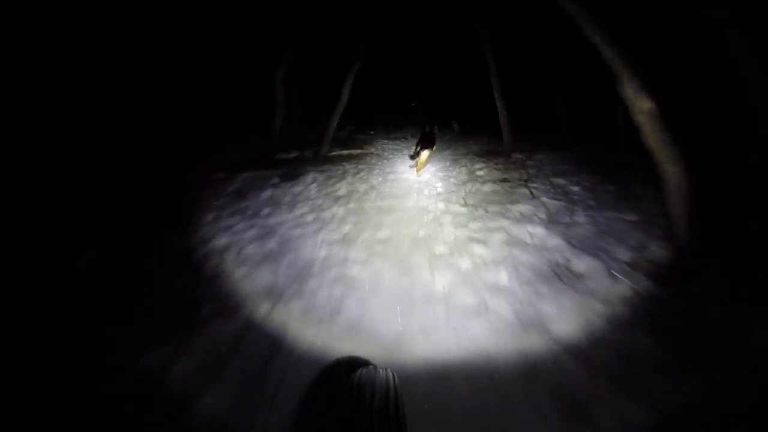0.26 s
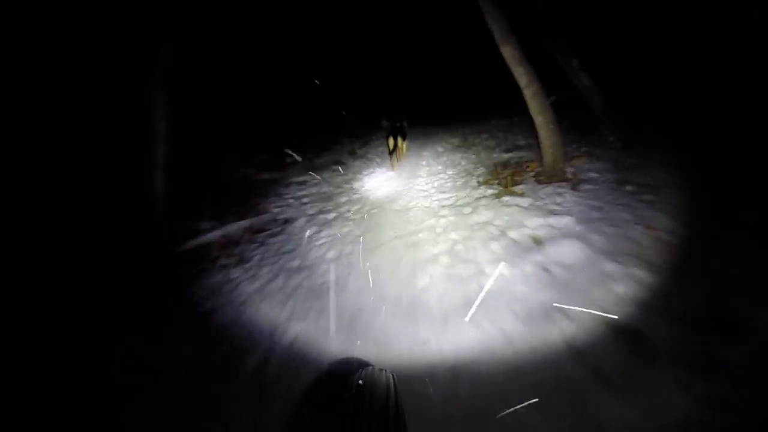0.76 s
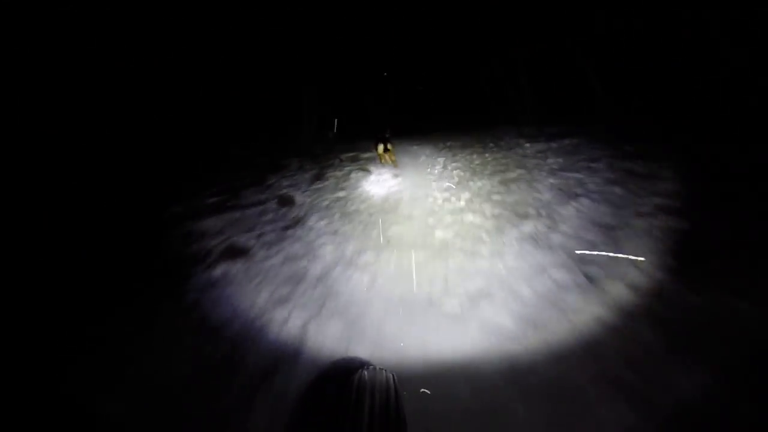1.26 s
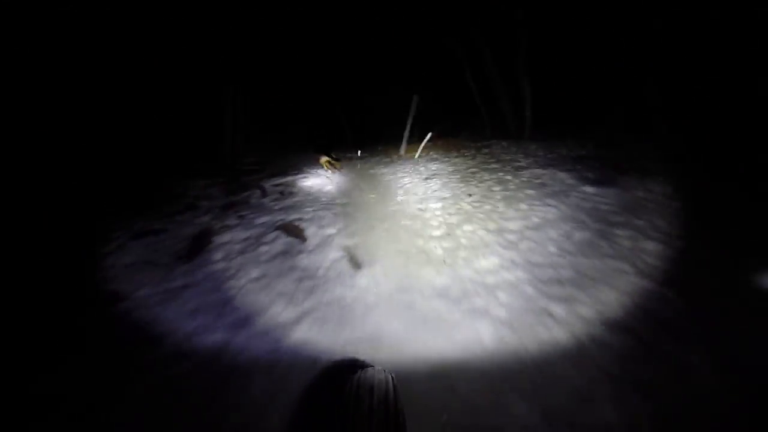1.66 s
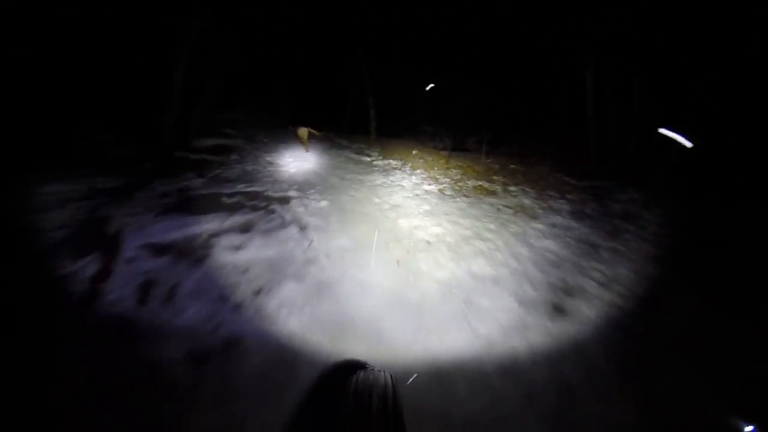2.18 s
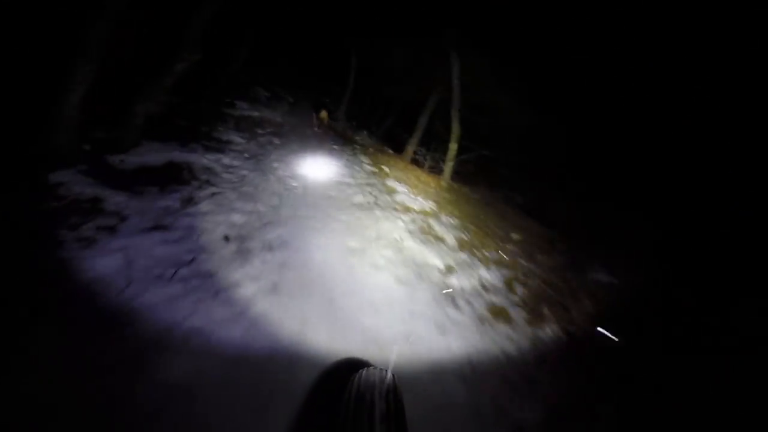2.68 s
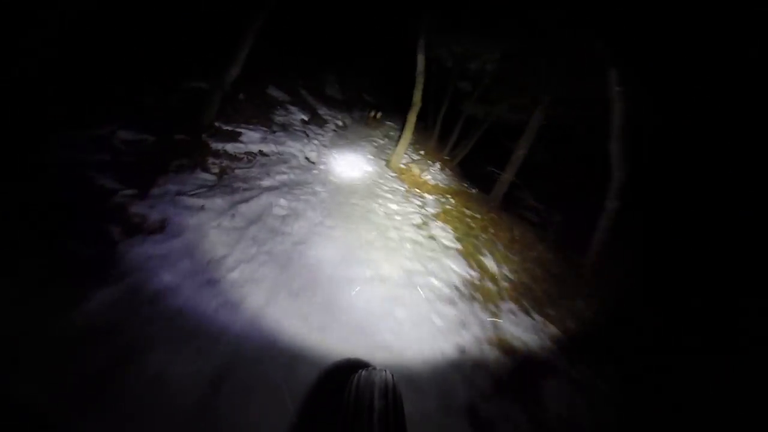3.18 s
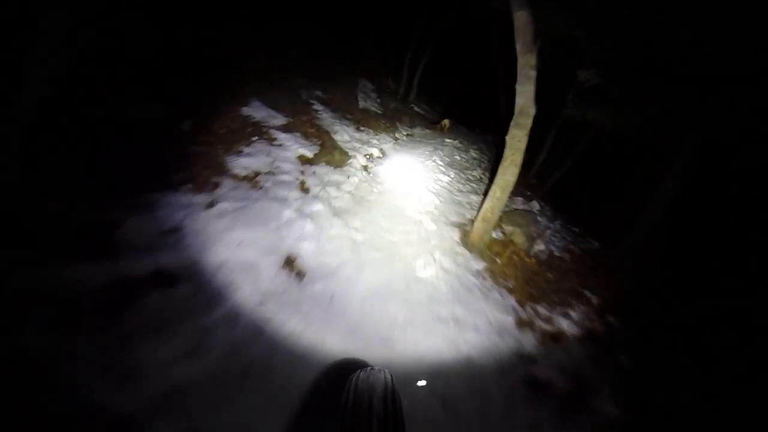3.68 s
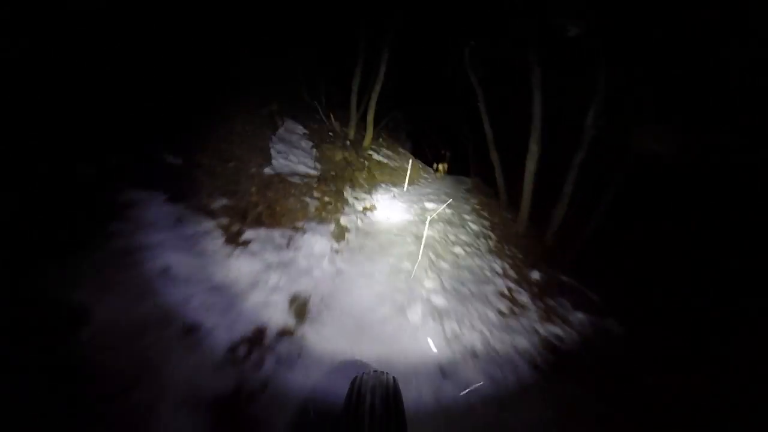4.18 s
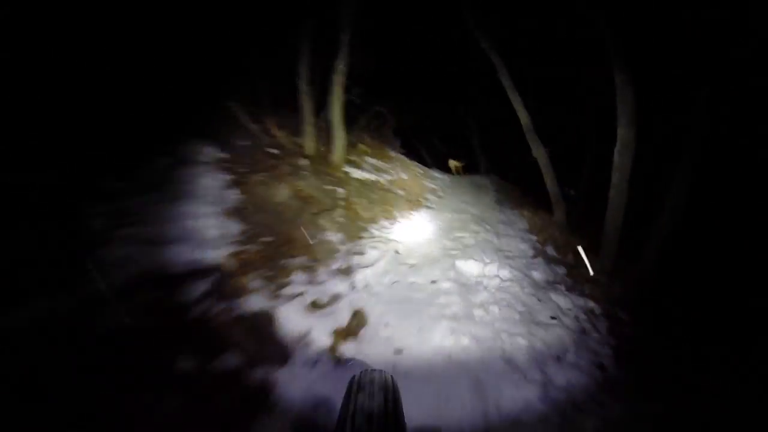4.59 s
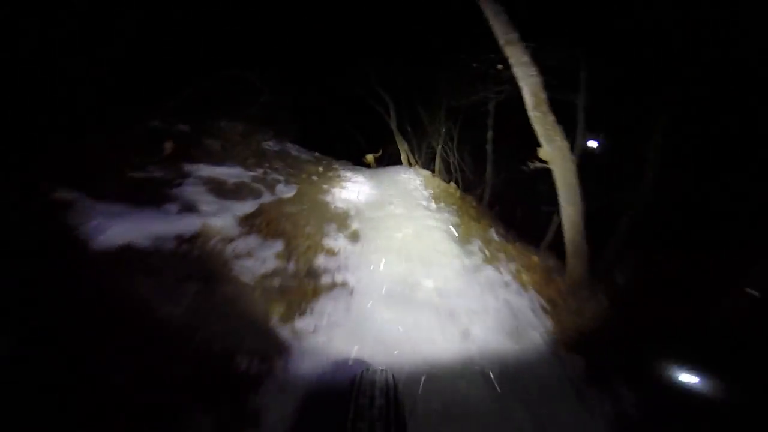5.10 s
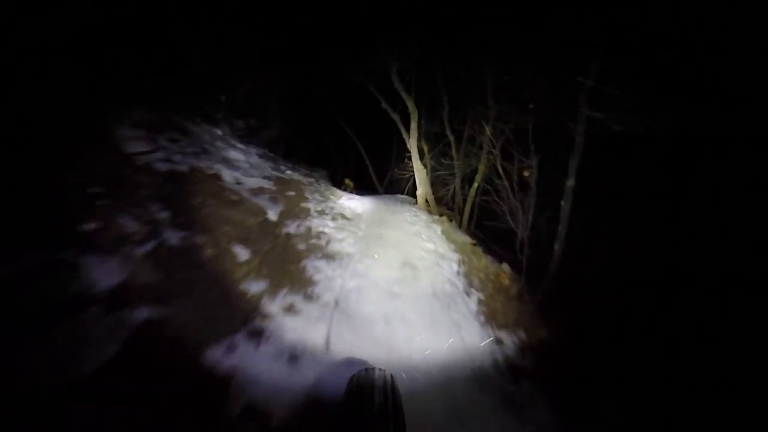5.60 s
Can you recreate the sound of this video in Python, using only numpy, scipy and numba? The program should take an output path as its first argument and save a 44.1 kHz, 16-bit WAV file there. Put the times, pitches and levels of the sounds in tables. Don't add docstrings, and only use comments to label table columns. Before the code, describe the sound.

Close, boxy handlebar sound of a fast snow ride: booming frame, gritty crunch, a camera clattering in its case, and brief squeaky disc brake rubs.

```python
import sys
import numpy as np
from scipy import signal
from scipy.io import wavfile
from scipy.ndimage import uniform_filter1d
from numba import njit

SR = 44100
rng = np.random.default_rng(int(sys.argv[2]) if len(sys.argv) > 2 else 0)


def master_out(mix):
    frames = np.transpose(np.atleast_2d(mix))
    ceiling = np.clip(frames, -1, 1)
    pcm = np.round(ceiling * 32767).astype(np.int16)
    wavfile.write(sys.argv[1], SR, pcm)


def field_ratio(decibels):
    return 10 ** (np.asarray(decibels, dtype=float) / 20)


N = 257984

# pitch in Hz, width in Hz, level in dB.
FRAME_TONES = [(34.8, 39, -9.5), (62.2, 53, -9), (109.1, 16, 0), (127.8, 21.7, -6)]
FORK_TONES = [(153.2, 47.3, 4), (209.7, 66, -5.5), (278.2, 11.5, -9.5), (436, 610, -37)]
MOUNT_TONES = [(725.4, 84, 3), (826, 52, 3), (980.5, 27.8, 3.5), (1380, 196, -1), (1574, 247, -5.5)]
SHELL_TONES = [(1922, 71, 5), (2094, 77, 7), (2390, 224, 3.5), (2622, 82, 2), (2790, 137, -3),
               (3190, 120, -6)]
DOOR_TONES = [(4000, 270, -7.5), (5013, 220, 1.5), (5447, 184, 2.5), (6050, 250, 0), (6610, 600, -10.5)]
CLICK_TONES = [(8140, 1160, -7), (8760, 150, -1.5), (10180, 400, 2.5), (11600, 2200, -6), (15300, 830, -4)]
DISC_TONES = [(5000, 36, -3), (5470, 150, -4.5), (6110, 60, -0.5), (8400, 700, -20)]

# time in seconds, frame shake in dB.
RUTS = [(0.0, -16), (1.37, -18), (1.43, -13), (1.9, -21.5), (1.95, -7.5), (2.08, -32), (2.13, -12.5),
        (2.2, -25), (2.3, -11), (2.56, -21.5), (2.78, -12.5), (3.19, -19.5), (3.24, -15.5), (4.1, -13.5),
        (4.68, -16.5), (4.97, -16), (5.38, -22), (5.85, -16.5)]
# time in seconds, crunch level in dB.
CRUST = [(0.0, -33), (0.31, -35), (0.75, -35.5), (0.91, -31), (1.09, -32.5), (1.94, -34), (2.8, -29.5),
         (3.03, -33), (3.45, -31), (3.75, -32.5), (4.07, -30), (4.4, -34), (5.13, -36.5), (5.31, -40),
         (5.51, -37.5), (5.85, -34.5)]
# start in seconds, peak in dB.
BUMPS = [(0.109, -1.5), (0.331, -5), (0.396, -5), (0.528, -2), (0.728, -4), (1.138, -9), (1.7, -2.5),
         (2.149, -6.5), (3.469, -4), (4.747, -5), (4.939, -3), (4.999, -7), (5.171, -7.5)]

# start in seconds, edge click in dB, shell in dB.
SLAMS = [(.0142, -37, -19), (.0837, -36, -18), (.1447, -25.5, -14), (.2005, -36, -17), (.2775, -30, -19),
         (.3538, -22.5, -12), (.4821, -34, -14.5), (.5302, -43, -19), (.548, -24.5, -16),
         (.6729, -34.5, -18), (.7253, -35, -18.5), (.9297, -39, -17), (.9838, -25, -13), (1.1185, -27, -6),
         (1.2148, -39, -22), (1.655, -40, -16), (1.8647, -31, -28), (2.2254, -30, -17),
         (2.3007, -28, -13.5), (2.9617, -32.5, -19), (3.3046, -34, -10.5), (3.468, -37, -17),
         (4.4742, -26.5, -14), (4.738, -16, -4.5), (4.9362, -23.5, -9.5), (5.0476, -24.5, -12),
         (5.2046, -16.5, -10), (5.3547, -29, -19.5), (5.4062, -33.5, -20.5), (5.476, -29, -14.5)]
# start in seconds, edge click in dB, shell in dB.
SLAPS = [(.0508, -34, -28), (.406, -35, -33), (.435, -34, -22), (.7937, -29.5, -17.5),
         (.8875, -28.5, -19.5), (1.0593, -38, -20), (1.1865, -29.5, -21), (1.264, -28, -18),
         (2.161, -29.5, -22.5), (2.4066, -38, -17), (2.559, -41, -20), (3.5327, -28, -9.5),
         (3.6743, -39, -16), (3.796, -39.5, -18.5), (3.8579, -31, -13), (4.013, -30, -13),
         (4.0817, -44, -17), (4.1378, -30.5, -20), (4.2505, -23.5, -7.5), (4.2966, -43, -10),
         (4.3762, -44, -21), (4.4068, -34.5, -18), (4.6117, -34.5, -18), (4.9945, -29, -21.5),
         (5.1394, -36.5, -17.5), (5.2636, -37, -19), (5.289, -49, -19.5), (5.661, -33, -17),
         (5.6936, -36, -14), (5.807, -38.5, -18)]
# start in seconds, edge click in dB.
TICKS = [(0.0326, -52), (.259, -39), (0.7723, -43), (0.813, -43), (.8428, -39), (1.302, -42),
         (1.366, -35.5), (1.3925, -38), (1.4253, -42), (1.4845, -36), (1.5214, -38.5), (1.5797, -38.5),
         (1.8127, -36.5), (1.9844, -43), (2.0325, -39.5), (2.213, -55), (2.4818, -42), (2.9002, -32.5),
         (3.3394, -38), (3.416, -41.5), (4.19, -34.5), (4.593, -44), (4.682, -38.5), (4.7025, -39),
         (4.8337, -39), (4.8888, -35.5), (5.0923, -36), (5.553, -47), (5.609, -50), (5.752, -43)]

# start in seconds, peak in dB, pitch in Hz, shell in dB.
CABLE_KNOCKS = [(0.323, -7, 2230, -14), (0.475, -14, 1480, -15), (0.481, -8.5, 1384, -16),
                (0.666, -15, 1490, -13), (0.828, -12, 1390, -22.5), (1.023, -10.5, 1330, -8),
                (1.119, -4.5, 1355, -6), (1.216, -17, 1460, -29), (1.292, -10.5, 1380, -12),
                (1.504, -15.5, 1510, -13), (1.605, -6.5, 1380, -16), (1.883, -4.5, 1424, -6.5),
                (1.934, -16, 1325, -12.5), (2.788, -9, 1360, -11), (3.011, -22, 2090, -13),
                (3.455, -3, 700, -8), (5.209, 3, 2340, -7.5), (5.445, -17, 2390, -18.5)]
# start in seconds, peak in dB, pitch in Hz, shell in dB.
TYRE_THUMPS = [(0.126, -12, 330, -16.5), (0.244, -13.5, 356, -22), (0.532, -11, 353, -50),
               (1.529, -18, 444, -20), (1.713, -12, 406, -15), (2.003, -13.5, 393, -36),
               (2.13, -26, 361, -23), (2.27, -20, 595, -11), (.727, -17, 403, -27),
               (2.794, -18.5, 470, -26), (3.468, -12, 390, -15), (4.938, -18, 504, -53)]

# start in seconds, time held in seconds, pad rub in dB.
LEVER_PULLS = [
    (.9, 0.21, -54),
    (1.47, 0.24, -44),
    (1.76, 0.29, -46),
    (2.1, 0.25, -59),
    (2.33, 0.33, -50),
    (2.66, 0.18, -42.5),
    (2.98, 0.13, -54.5),
    (3.72, 0.27, -56),
]
# start in seconds, level in dB, pitch in Hz, length in seconds.
SQUEAKS = [(0.508, -52, 8100, .03), (0.675, -46, 8060, 0.026), (1.021, -40, 6000, .016),
           (1.054, -33, 6050, 0.013), (1.105, -26, 6040, .014), (1.494, -30, 6110, .017),
           (1.522, -35, 6110, 0.013), (1.573, -56, 8620, .057), (1.61, -41, 6110, 0.032),
           (1.637, -43, 8600, .03), (1.703, -24, 6110, 0.017), (1.696, -46, 8650, .024),
           (1.738, -48, 6110, 0.064), (1.807, -37, 6110, .013), (1.869, -25.5, 6130, 0.013),
           (1.937, -46, 6200, .021), (1.97, -31.5, 6120, 0.014), (1.977, -42, 8550, 0.033),
           (2.178, -56, 6800, 0.17), (3.422, -62, 8400, .036)]
# start in seconds, peak in dB, length in seconds.
GRABS = [
    (2.554, -28.5, 0.047),
    (2.702, -28, 0.044),
    (3.1564, -26, 0.021),
    (3.415, -39, 0.021),
    (3.742, -26, 0.027),
]


def shake(frame_db, fork_db):
    jolts = field_ratio(3.1 * walk(23.49)) * rng.standard_normal(N)
    frame = through(jolts, FRAME_TONES)
    fork_jolts = 0.56 * jolts + field_ratio(3.28 * walk(30)) * rng.standard_normal(N)
    fork = through(fork_jolts, FORK_TONES)
    out = field_ratio(frame_db) * (frame + field_ratio(fork_db) * fork)

    swing = ring(FRAME_TONES, 1.87) + 0.31 * ring(FORK_TONES, 1.49)
    t = np.arange(len(swing)) / SR
    swing = swing * (1 - np.exp(-t / 0.0011))
    since = t / 0.0054
    hush = 1 - since * np.exp(1 - since)
    for start_s, db in BUMPS:
        i = int(start_s * SR)
        out[i:i + len(hush)] *= hush[:N - i]
        add(out, start_s, field_ratio(db) * swing / np.abs(swing).max())
    return out


def crunch(shell_db, mount_db):
    patch_db = 4.5 - 0.4 * (shell_db - shell_db.mean())
    cracks = field_ratio(patch_db * np.minimum(walk(70), 1.4)) * grains(400, 2.2)
    buzz = cracks + 0.5 * rng.standard_normal(N)
    mount = patchy(buzz + 0.95 * rng.standard_normal(N), MOUNT_TONES, flicker_db=2, rate=25)
    low = field_ratio(-9) * through(buzz, [(446.5, 80, 0)])
    shell = patchy(buzz, SHELL_TONES[:-1], flicker_db=3.5, rate=30)
    loose = (0.03 + settling(0.024)) * field_ratio(6 * walk(50)) * grains(330, 7.6)
    top = field_ratio(-18) * patchy(buzz + 1.04 * loose, DOOR_TONES, flicker_db=1.5, rate=35)
    top += field_ratio(-30) * through(loose + 0.035 * cracks, CLICK_TONES, damp=1.2)
    return field_ratio(mount_db) * (mount + low) + field_ratio(shell_db) * (shell + top)


def rattles():
    out, t = np.zeros(N), np.arange(2048) / SR
    hits = contacts()
    scrape = rng.standard_normal((len(hits), 4, 2048))
    # tones, contact time in seconds, damping, level trim in dB
    parts = [(CLICK_TONES, 0.0012, 1.5, 0), (DOOR_TONES, 0.0016, 1.5, -1),
             (SHELL_TONES, 0.0025, 1.3, -3), (MOUNT_TONES, 0.003, 1.3, -5)]
    for k, (modes, contact_s, damp, trim_db) in enumerate(parts):
        push = scrape[:, k] * (np.exp(-t / contact_s) + 0.14 * np.exp(-t / 0.0041))
        rung = signal.fftconvolve(push, ring(modes, damp, size=2048)[None], axes=1)[:, :2048]
        for hit, sound in zip(hits, rung):
            add(out, hit[0], field_ratio(hit[1 + k] + trim_db) * sound / np.abs(sound).max())
    return out


def contacts():
    ticks = [(start_s, click_db, click_db + 6.5) for start_s, click_db in TICKS]
    rows = []
    for hits, mount_trim_db in ((SLAMS, -13.5), (SLAPS, -43), (ticks, -17)):
        for start_s, click_db, shell_db in hits:
            door_db = 0.57 * click_db + 0.43 * shell_db + 1.5
            mount_db = 0.39 * shell_db + mount_trim_db
            rows.append((start_s, click_db, door_db, shell_db, mount_db))
    return rows


def settling(settle_s):
    kicks = np.zeros(N)
    for start_s, click_db, *_ in contacts():
        add(kicks, start_s + 0.005, field_ratio([0.5 * click_db + 19]))
    return signal.lfilter([1], [1, -np.exp(-1 / (settle_s * SR))], kicks)


def knocks(blows, ring_s, rough, scuff_s):
    out, t = np.zeros(N), np.arange(4096) / SR
    scrape = rng.standard_normal((len(blows), 2, 4096))
    case = ring(SHELL_TONES, 0.7) + 0.9 * ring(MOUNT_TONES, 0.36) + 0.14 * ring(DOOR_TONES, 0.48)
    width = np.log(1000) / np.pi / ring_s
    for (start_s, db, hz, shell_db), grit in zip(blows, scrape):
        modes = [(hz, width, 0), (1.1 * hz, 2 * width, -10), (0.9 * hz, 2 * width, -10)]
        push = (t == 0) + rough * grit[0] * np.exp(-t * hz / 1.77)
        tap = signal.fftconvolve(push, ring(modes, 1))[:4096]
        tap = tap * (1 - np.exp(-t * hz / 2.4))
        scuff = signal.fftconvolve(grit[1] * t / scuff_s * np.exp(-t / scuff_s), case)[:4096]
        add(out, start_s, field_ratio(db - 5.5) * tap / np.abs(tap).max())
        add(out, start_s, field_ratio(shell_db - 2) * scuff / np.abs(scuff).max())
    return out


def brake(rub_db):
    grip = field_ratio(rub_db + 3 * walk(80)) * (grains(1800, 4.0) + 0.32 * rng.standard_normal(N))
    case = unit(ring(DOOR_TONES, 0.46) + 0.08 * ring(CLICK_TONES, 1.4))
    body = case + 0.35 * unit(ring(DISC_TONES, 0.42))
    out = signal.fftconvolve(grip, body / 64)[:N]
    waver = walk(250)
    for start_s, db, hz, length_s in SQUEAKS:
        share = np.linspace(0, 1, max(int(length_s * 1.2 * SR), 64))
        shiver = waver[int(start_s * SR):][:len(share)]
        pitch = (hz - 33 * share) * (1 + 0.0046 * shiver)
        phase = 2 * np.pi * np.cumsum(pitch) / SR
        loudness = field_ratio(db + 2.8 * shiver[::-1]) * np.sin(np.pi * share)
        add(out, start_s, loudness * np.sin(phase))
    return out


def lever():
    t = np.arange(N) / SR
    rub = field_ratio(-61) * np.ones(N)
    for start_s, held_s, db in LEVER_PULLS:
        rise = np.clip((t - start_s) / 0.024, 0, 1)
        release = np.exp(-np.maximum(t - start_s - held_s, 0) / 0.026)
        rub += field_ratio(db) * rise * release
    return 20 * np.log10(rub)


def grabs():
    out = np.zeros(N)
    body = unit(ring(DOOR_TONES, 1)) + unit(ring(DISC_TONES[:1], 0.84))
    for (start_s, db, length_s), grit in zip(GRABS, rng.standard_normal((len(GRABS), 8192))):
        swell = np.sin(np.pi * np.clip(np.arange(len(grit)) / SR / length_s, 0, 1))
        bite = signal.fftconvolve(grit * swell, body)
        add(out, start_s, field_ratio(db) * bite / np.abs(bite).max())
    return out


def grains(rate, spread_db):
    chance = rng.random((2, N))
    size_db = np.minimum(-spread_db * np.log(chance[1] + 1e-9), 5.17 * spread_db)
    sign = np.sign(rng.standard_normal(N))
    return unit((chance[0] < rate / SR) * field_ratio(size_db) * sign)


def ring(modes, damp, size=4096):
    t = np.arange(size) / SR
    out = np.zeros(size)
    for k, (hz, width, db) in enumerate(modes):
        fade = np.exp(-np.pi * width * damp * t)
        out += (-1) ** k * field_ratio(db) * width * fade * np.sin(2 * np.pi * hz * t)
    return out


def through(x, modes, damp=1):
    return unit(signal.fftconvolve(x, ring(modes, damp))[:N])


def patchy(x, modes, flicker_db, rate):
    out = np.zeros(N)
    for k, mode in enumerate(modes):
        tone = signal.fftconvolve(x, ring([mode], 1.0))[:N]
        out += (-1) ** k * field_ratio(flicker_db * walk(rate)) * tone
    return unit(out)


def walk(rate):
    k = int(SR / rate)
    steps = np.repeat(rng.standard_normal(N // k + 1), k)
    return 1.16 * uniform_filter1d(uniform_filter1d(steps, k), k)[:N]


def along(table):
    times, values = np.transpose(table)
    return np.interp(np.arange(N) / SR, times, values)


def unit(x):
    return x / np.sqrt(np.mean(x ** 2))


def add(out, start_s, sound):
    i = int(start_s * SR)
    out[i:i + len(sound)] += sound[:N - i]


@njit
def follow(x, attack, release):
    level, out = 0., np.empty(len(x))
    for i in range(len(x)):
        speed = attack if abs(x[i]) > level else release
        level += (abs(x[i]) - level) * speed
        out[i] = level
    return out


def scene():
    ruts, crust = along(RUTS), along(CRUST)
    fork_db = -19.5 + 0.32 * (ruts - ruts.mean()) + crust - crust.mean()
    tyre = shake(ruts + 1.52, fork_db - ruts) + crunch(shell_db=crust - 1, mount_db=crust - 2.5)
    hits = rattles()
    hits += knocks(CABLE_KNOCKS, ring_s=0.032, rough=0.25, scuff_s=0.002)
    hits += knocks(TYRE_THUMPS, ring_s=0.01, rough=0.075, scuff_s=0.00077)
    return (tyre + hits + brake(lever()) + grabs())[None]


def band_limit(x):
    return signal.sosfilt(signal.butter(12, 16490, fs=SR, output="sos"), x)


def record(dry):
    peak = follow(dry[0], 0.028, 0.0006)
    held = dry * np.minimum(1, 0.85 / (peak + 1e-9)) ** 0.29
    top_edge = signal.ellip(4, 1, 17, 14700, fs=SR, output="sos")
    mix = signal.sosfilt(top_edge, 2 * np.tanh(held / 2))
    return band_limit(mix)


dry = scene()
out = record(dry)
master_out(out)
```